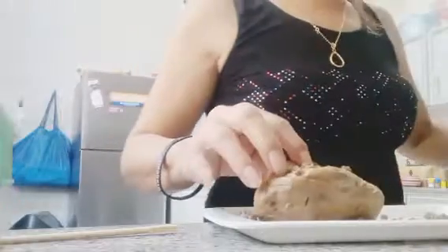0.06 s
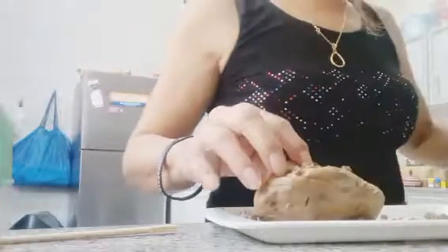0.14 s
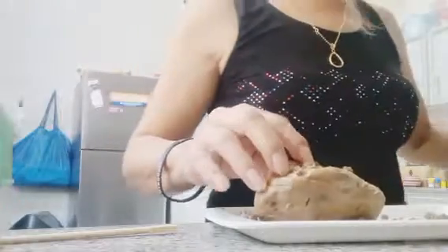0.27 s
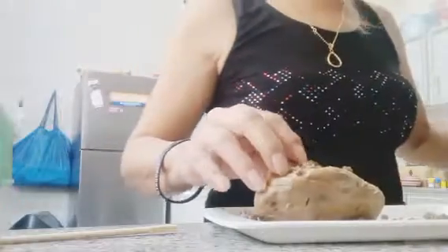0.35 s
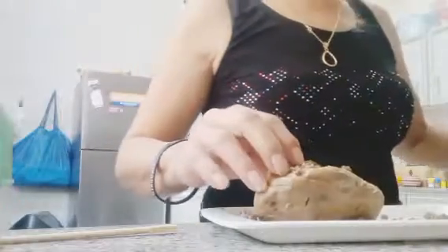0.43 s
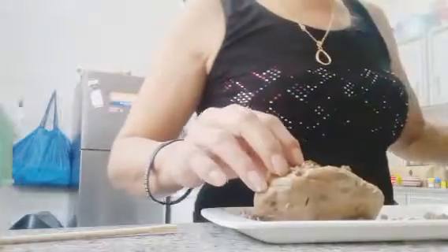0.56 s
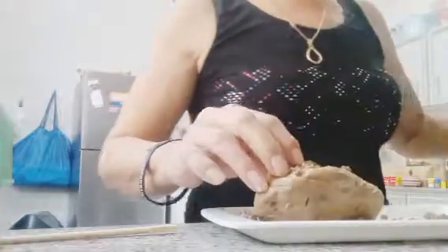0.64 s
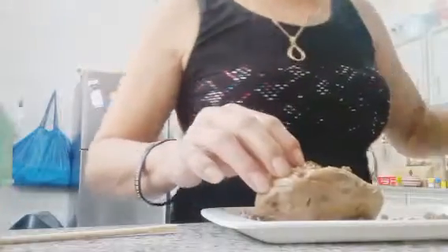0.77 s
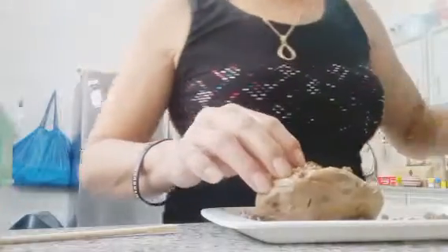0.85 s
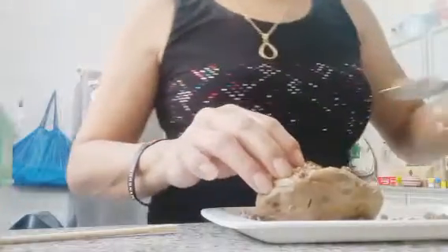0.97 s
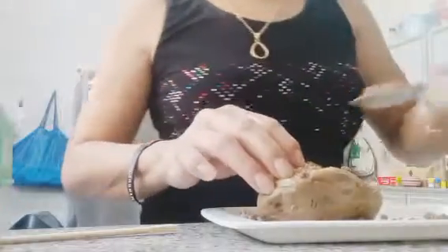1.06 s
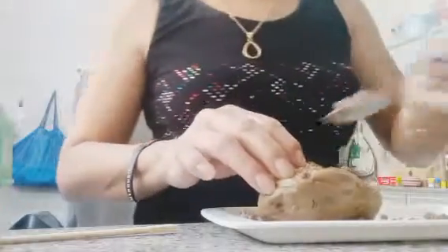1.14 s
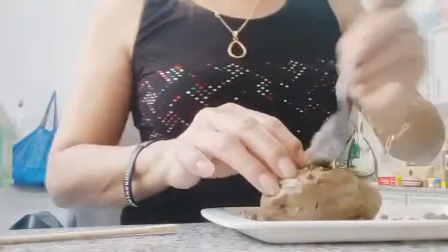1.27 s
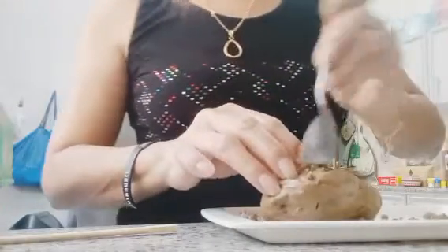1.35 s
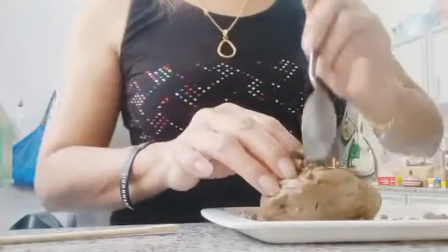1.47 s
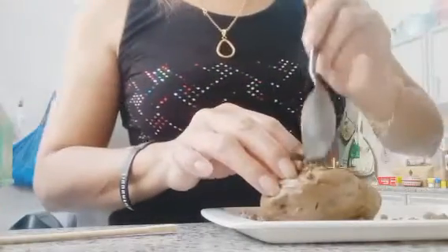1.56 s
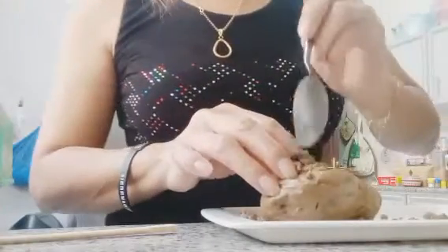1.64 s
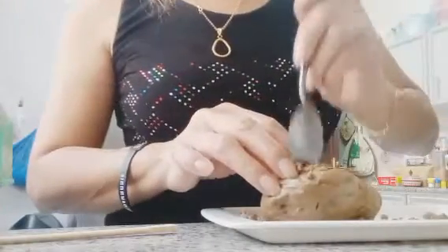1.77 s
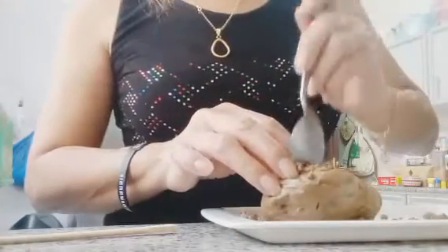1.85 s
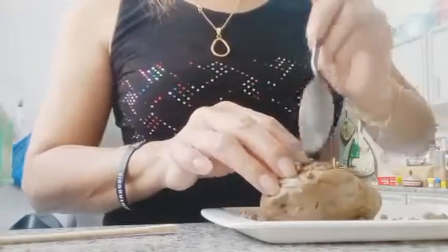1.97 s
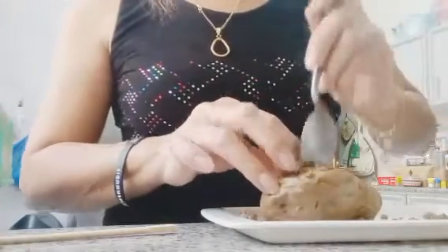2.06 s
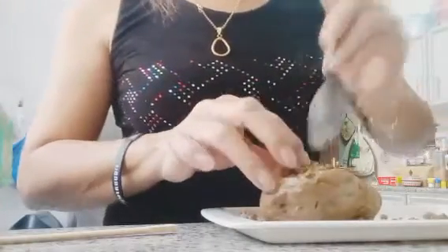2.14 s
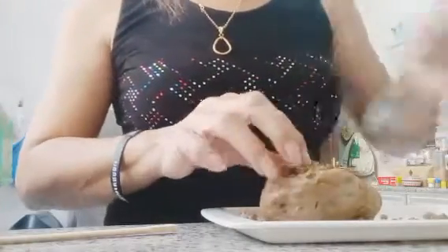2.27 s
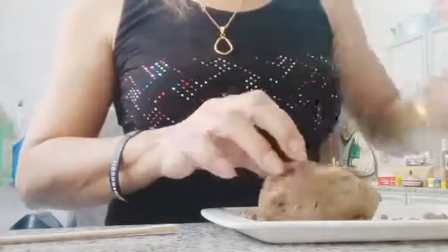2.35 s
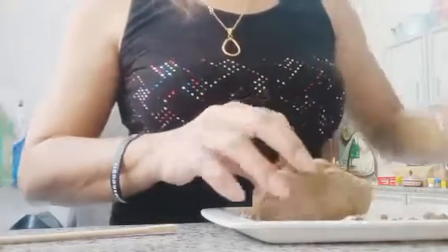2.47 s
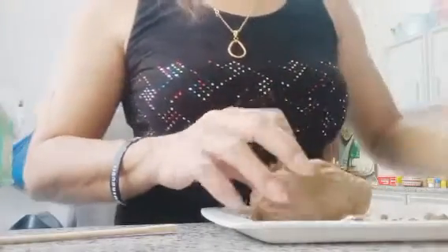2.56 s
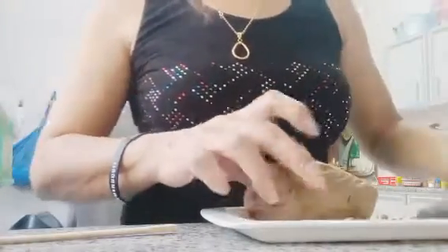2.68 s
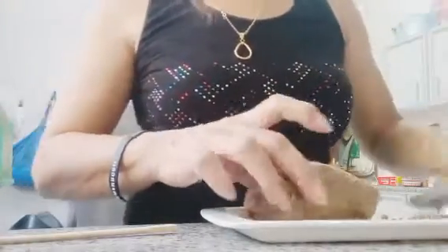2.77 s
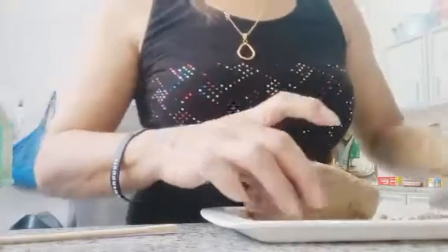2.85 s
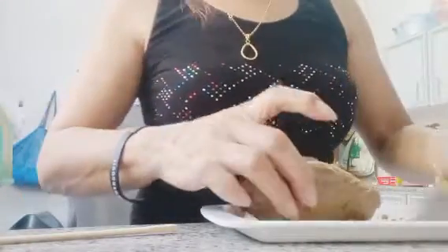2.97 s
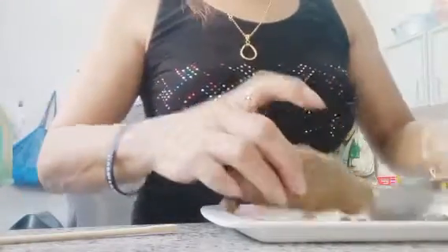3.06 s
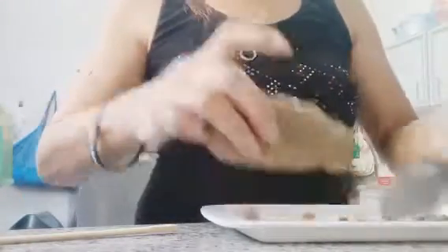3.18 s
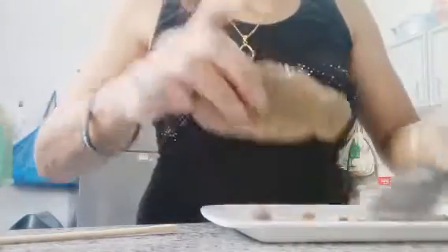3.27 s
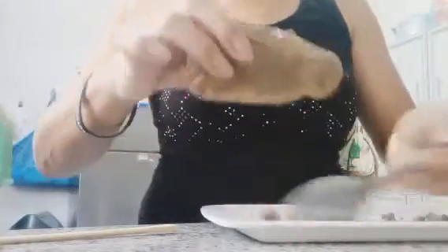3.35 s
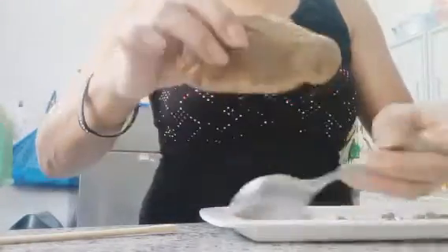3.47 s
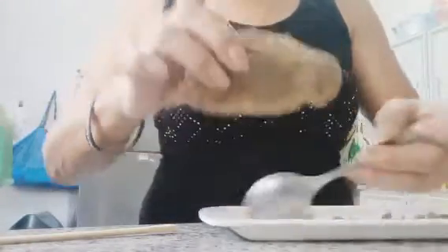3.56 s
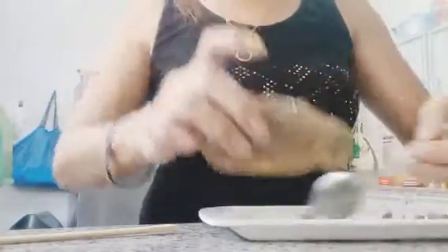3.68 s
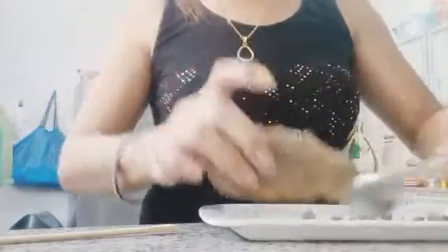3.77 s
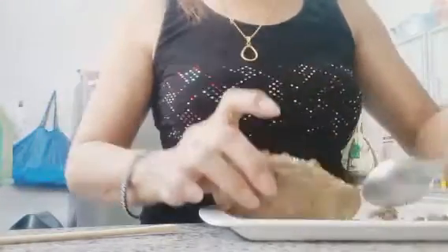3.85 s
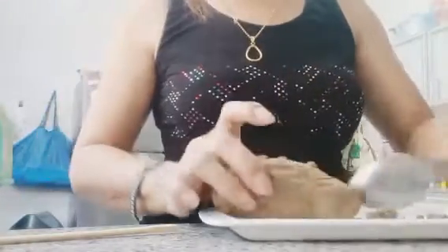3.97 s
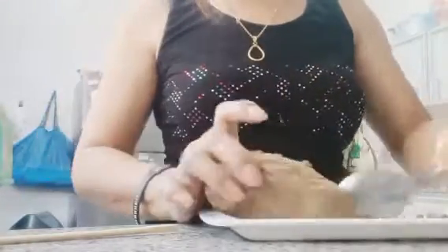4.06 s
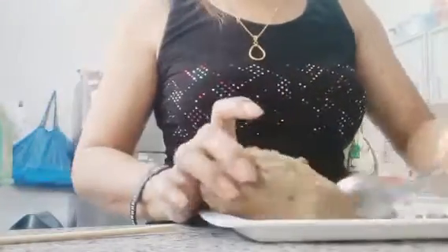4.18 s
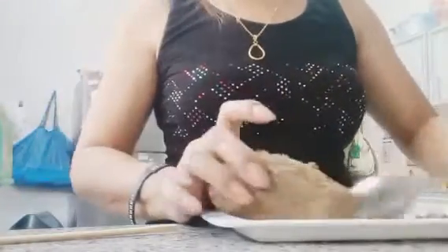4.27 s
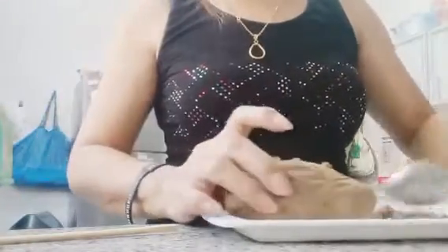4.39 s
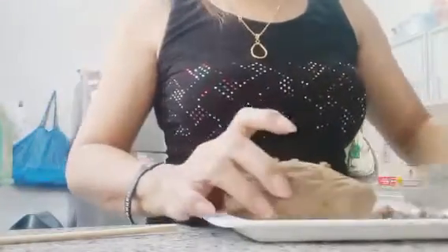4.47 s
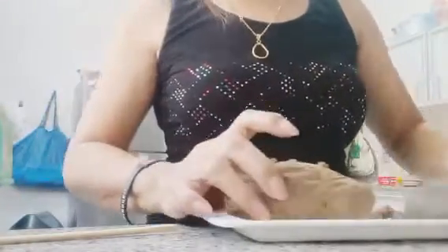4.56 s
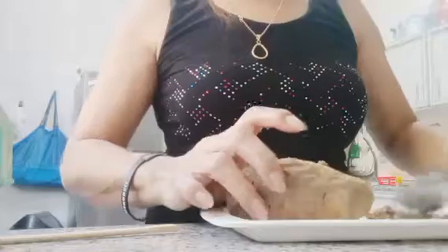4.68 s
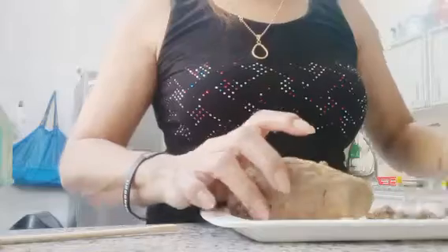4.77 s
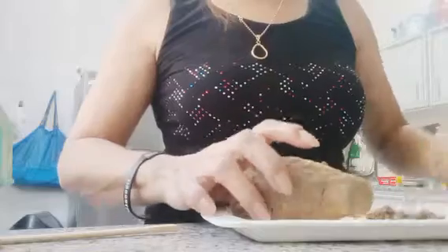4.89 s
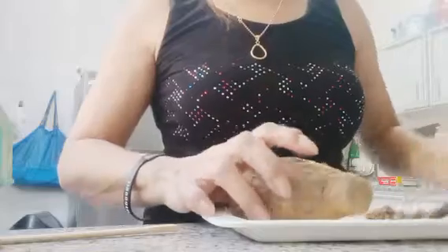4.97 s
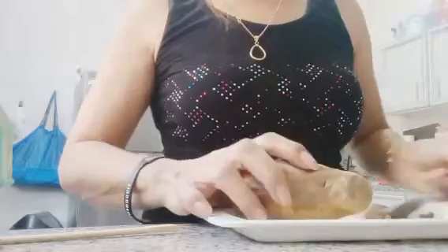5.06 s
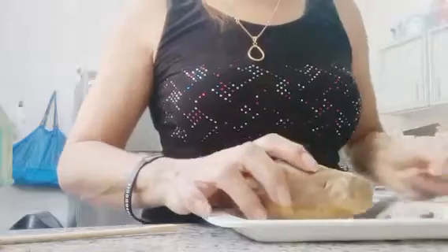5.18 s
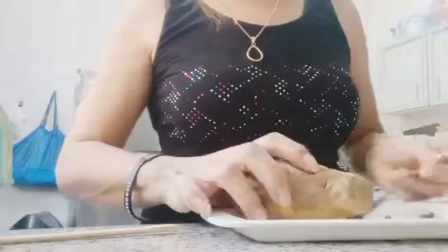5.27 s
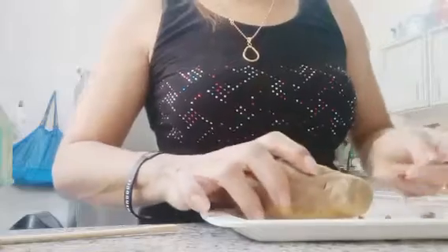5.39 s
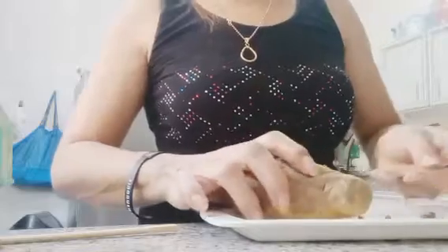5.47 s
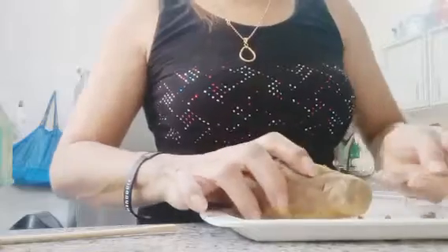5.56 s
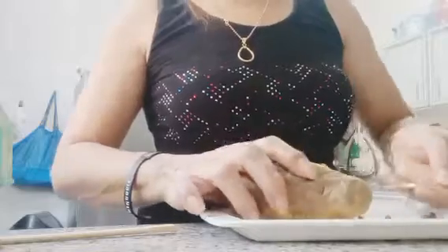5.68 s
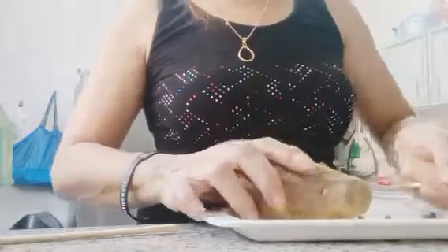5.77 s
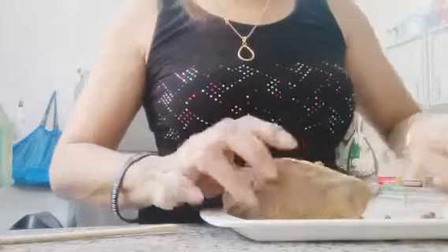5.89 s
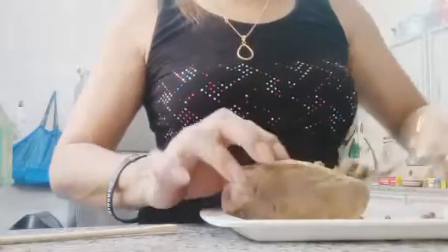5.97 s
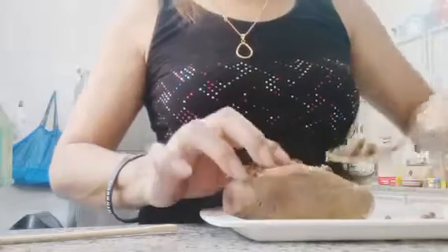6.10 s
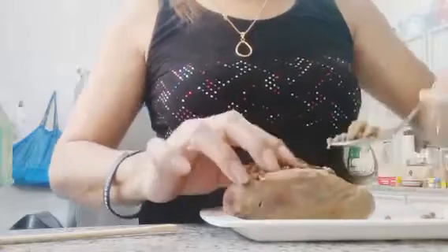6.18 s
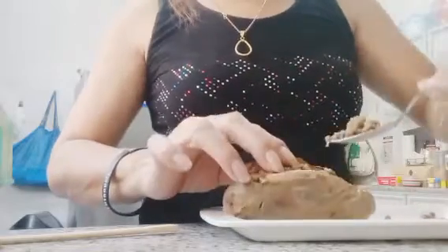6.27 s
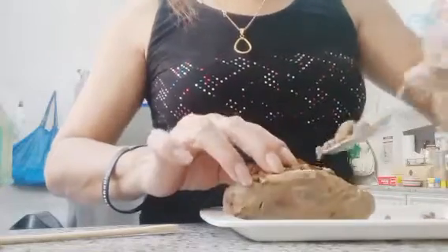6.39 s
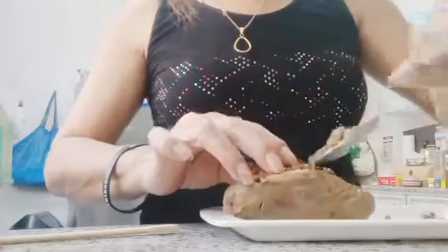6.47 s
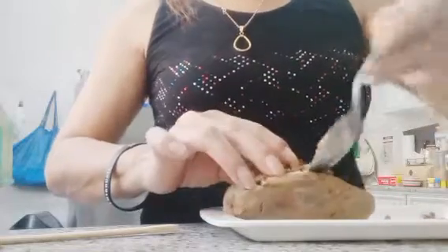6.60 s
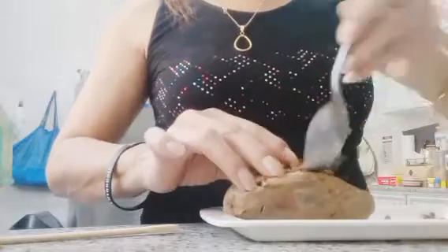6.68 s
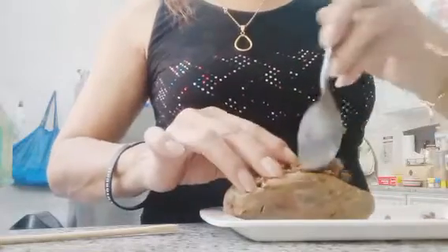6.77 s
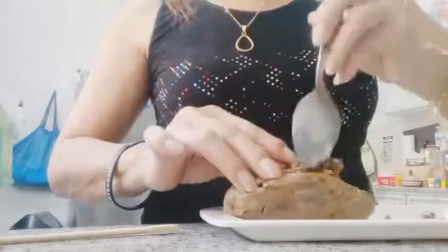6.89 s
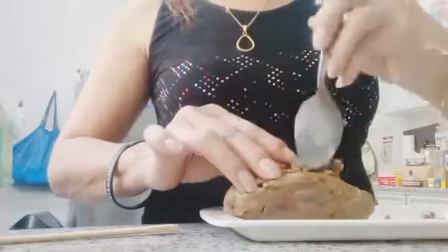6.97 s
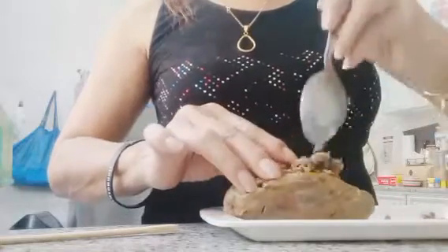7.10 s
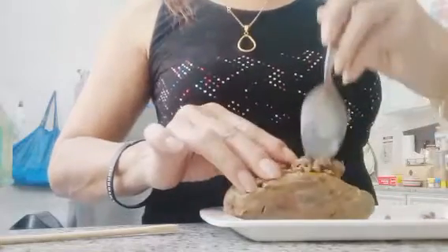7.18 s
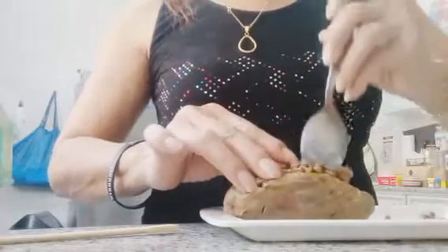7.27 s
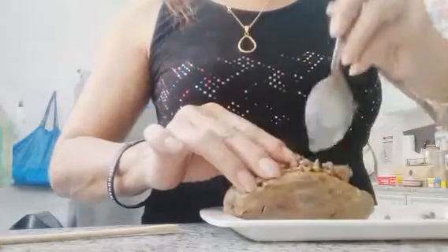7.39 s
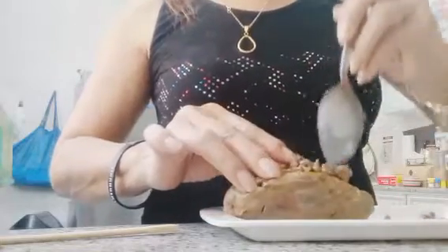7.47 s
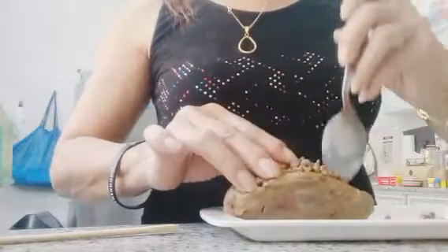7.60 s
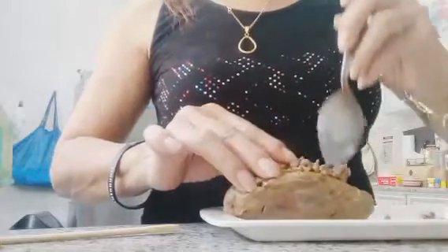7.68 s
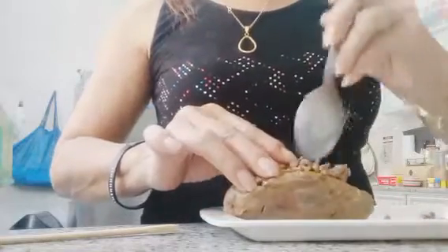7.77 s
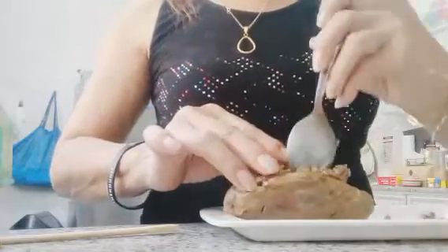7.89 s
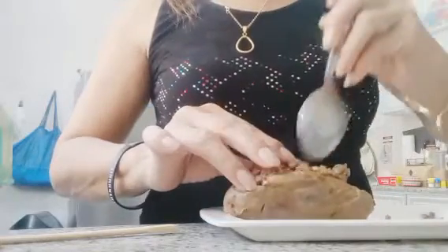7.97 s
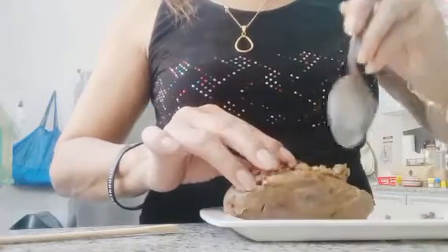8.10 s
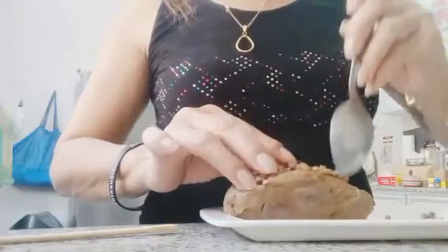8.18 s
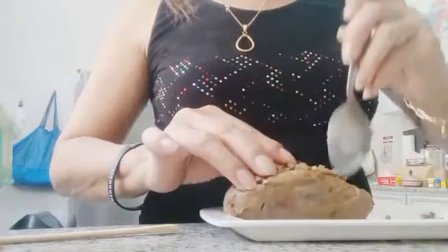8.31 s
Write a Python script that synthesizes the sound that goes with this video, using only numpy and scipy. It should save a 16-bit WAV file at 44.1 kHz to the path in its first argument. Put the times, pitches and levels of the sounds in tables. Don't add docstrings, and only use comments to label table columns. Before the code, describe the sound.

Quiet humming kitchen with faint crumb ticks, then three seconds of sharp spoon clacks and gritty scrapes on a ceramic plate, then quiet again.

```python
import sys
import numpy as np
from scipy import signal
from scipy.fft import rfft, irfft, next_fast_len
from scipy.io import wavfile
from scipy.ndimage import uniform_filter1d

SR = 44100
rng = np.random.default_rng(int(sys.argv[2]) if len(sys.argv) > 2 else 0)


def pcm_store(signal):
    levels = np.round(np.clip(np.atleast_2d(signal), -1, 1) * 32767)
    wavfile.write(sys.argv[1], SR, levels.astype(np.int16).T)


def makeup_ratio(level_db):
    decades = np.asarray(level_db, float) / 20
    return 10 ** decades


N = 367735
T = np.arange(N) / SR
BUSY = slice(int(2.5 * SR), int(5.4 * SR))
ALIKE_HZ = 800


def shape(x, gain):
    n = next_fast_len(x.shape[-1])
    hz = np.arange(n // 2 + 1) * SR / n + 1
    return irfft(rfft(x, n) * gain(hz), n)[..., :x.shape[-1]]


def colour(points, hz):
    f, db = np.transpose(points)
    return makeup_ratio(np.interp(np.log(hz), np.log(f), db))


def peak(hz, centre_hz, width_hz):
    return np.exp(-2 * ((hz - centre_hz) / width_hz) ** 2)


def bumps(rows, hz):
    return sum(db * peak(hz, centre, width) for centre, width, db in rows)


def unit(x):
    return x / np.sqrt(np.mean(x ** 2))


def fade(t, t60):
    return np.exp(-np.log(1000) * t / t60)


def walk(rate):
    k = int(SR / rate)
    steps = np.repeat(rng.standard_normal(N // k + 1), k)
    return 1.6 * uniform_filter1d(uniform_filter1d(steps, k), k)[:N]


def swells(rows, steady_db):
    t = T[::64]
    power = makeup_ratio(steady_db) ** 2
    power = power + sum(makeup_ratio(db) ** 2 * peak(t, s, length) ** 2 for s, length, db in rows)
    return np.interp(T, t, 10 * np.log10(power))


def tone(hz):
    return np.sin(2 * np.pi * np.cumsum(hz) / SR)


def add(out, s, x):
    i = int(s * SR)
    out[..., i:i + x.shape[-1]] += x[..., :out.shape[-1] - i]


# (frequency [Hz], level [dB per Hz])
AIR_COLOUR = [(12, -60), (20, -26), (37, -25), (73, -16.5), (108, -6), (151, -11), (297, -14), (492, -16.5),
              (670, -22), (1510, -32.5), (4050, -41.5), (4530, -39.5), (11100, -53), (15200, -59),
              (16500, -66)]
# (frequency [Hz], width [Hz], level [dB])
AIR_BUMPS = [(46.5, 4.3, 7), (94.06, 32, 5.5), (122.7, 7.4, -1), (434.3, 12, 4), (489, 60, -8.5),
             (680, 4.6, 11.5), (2150, 380, 3), (6300, 920, 4.5), (15200, 1500, 3)]
AIR_DB = -54.5


def air():
    def spectrum(f):
        return colour(AIR_COLOUR, f) * makeup_ratio(bumps(AIR_BUMPS, f))

    def apart(f):
        return 0.03 + 0.47 / (1 + (ALIKE_HZ / f) ** 2.5)

    mid = shape(rng.standard_normal(N), lambda f: spectrum(f) * np.sqrt(1 - apart(f)))
    side = shape(rng.standard_normal(N), lambda f: spectrum(f) * np.sqrt(apart(f)))
    n = next_fast_len(N)
    both = rfft(np.array([mid + side, mid - side]), n)
    half_octaves = 2 * np.log2((np.arange(n // 2 + 1) * SR / n + 1) / 32)
    out = 0
    for k in range(-1, 19):
        window = np.cos(np.pi / 2 * np.clip(half_octaves - k, -1, 1)) ** 2
        band = irfft(both * window, n)[:, :N]
        swell_db = 3.5 if k < 4 else 1.2
        out = out + band * makeup_ratio(swell_db * walk(4) + 0.8 * walk(12))
    return unit(out) * makeup_ratio(AIR_DB)


# (time [s], length [s], level [dB])
HUM_SWELLS = [(.17, 0.044, -47), (.5, 0.14, -50), (.78, .13, -47.5), (1.3, .07, -52), (1.52, 0.12, -44),
              (1.68, 0.087, -50.5), (1.85, 0.14, -44.5), (2.66, 0.036, -46), (3.22, 0.048, -46.5),
              (3.52, 0.089, -53), (3.79, 0.034, -43.5), (4.35, 0.085, -57), (4.63, 0.09, -47),
              (5.2, 0.21, -51), (5.46, 0.1, -47), (5.82, 0.11, -47.5), (6.32, 0.065, -46.5),
              (6.6, 0.11, -46), (6.89, 0.053, -47.5), (7.05, 0.1, -50.5), (7.3, 0.15, -51),
              (7.65, .12, -49.5), (8.1, 0.17, -52), (8.29, .07, -47)]
HUM_HZ, HUM_WANDER_HZ, HUM_DB = 98.4, 4, -58
THROB_HZ, THROB_DEPTH = 10.6, 0.37


def fridge():
    phase = 2 * np.pi * np.cumsum(HUM_HZ + HUM_WANDER_HZ * walk(8)) / SR
    throb = 1 + THROB_DEPTH * tone(THROB_HZ + 2.1 * walk(2.7))
    level_db = swells(HUM_SWELLS, HUM_DB) + 0.98 * walk(12)
    level_db = level_db + np.array([[-0.4], [0.4]])
    return np.sqrt(2) * throb * np.sin(phase + np.array([[0], [0.15]])) * makeup_ratio(level_db)


# (time [s], length [s], level [dB])
LOW_WHINE = [
    (0.222, .1, -78),
    (0.416, 0.086, -74.5),
    (1.29, 0.17, -76.5),
    (2.4, .14, -84),
    (5.95, 0.12, -73),
    (7.11, .1, -73),
    (7.686, 0.14, -74),
    (7.84, 0.074, -80),
    (8.108, 0.062, -77),
    (8.256, 0.09, -73.5),
]
# (time [s], length [s], level [dB])
HIGH_WHINE = [
    (.42, .2, -77),
    (1, 0.083, -70.5),
    (1.55, 0.1, -72),
    (2.2, 0.69, -79),
    (6.68, 0.5, -75.5),
    (7.3, 0.44, -79),
    (7.72, 0.17, -75),
    (8, .2, -75),
]
WHINE_WIDTH_HZ = 26


def whines():
    out = np.zeros((2, N))
    for hz, rows, steady_db in [(3527, LOW_WHINE, -104), (4447, HIGH_WHINE, -84.5)]:
        noise = rng.standard_normal((2, N))
        line = shape(noise, lambda f: peak(f, hz, WHINE_WIDTH_HZ) + 0.3 * peak(f, hz, 4 * WHINE_WIDTH_HZ))
        out += unit(line) * makeup_ratio(swells(rows, steady_db) + 4.5)
    return out


# (time [s], level [dB], centre [Hz], width as share of centre)
TICKS = [
    (0.614, -53, 8900, 0.14),
    (1.0257, -44.5, 5900, 0.14),
    (1.0394, -51, 6370, 0.28),
    (1.3763, -48, 6100, 0.12),
    (1.72, -45.5, 9700, 0.081),
    (1.7888, -62, 6050, 0.16),
    (5.9767, -61, 6040, 0.16),
    (6.2751, -49.5, 6390, 0.16),
]
# (time [s], level [dB], centre [Hz], width as share of centre)
FLICKS = [
    (0.9941, -61, 9500, 0.6),
    (1.0277, -49, 9890, 1),
    (1.235, -64, 9990, 0.6),
    (2.0742, -61, 9890, 0.7),
    (2.434, -62, 9370, 0.7),
    (5.978, -56, 8500, 0.63),
    (6.14, -51.5, 12570, 0.66),
    (6.4619, -62, 9860, 0.42),
    (7.4845, -66.5, 9850, 0.6),
]
# (time [s], level [dB], centre [Hz], width as share of centre)
TAPS = [
    (1.975, -60, 2600, .2),
    (6.276, -59, 2600, 0.36),
    (6.895, -55, 807, 0.14),
    (6.896, -56, 1360, 0.15),
    (6.895, -53.5, 2160, 0.26),
    (6.901, -60, 3250, 0.12),
]


def crumbs():
    out, t = np.zeros((2, N)), T[:SR // 10]
    for s, db, hz, share in TICKS + FLICKS + TAPS:
        width_hz = np.clip(share, 0.02, 2) * hz
        noise = rng.standard_normal((2, len(t)))
        grain = unit(shape(noise, lambda f: peak(f, hz, width_hz) + 0.056 * (f > 2500) * (hz > 4000)))
        envelope = np.clip(t / 0.0005, 0, 1) * fade(t, 0.038 * (6000 / hz) ** 0.89)
        add(out, s, makeup_ratio(db - 2.5) * grain * envelope)
    return out


# (time [s], length [s], level [dB])
BRUSHES = [
    (.6, 0.26, -76.5),
    (2.4, .5, -82),
    (5.22, 0.18, -72),
    (6.15, 0.45, -75),
    (6.5, 0.47, -79),
    (8.3, 0.55, -79),
]


def rustle():
    hiss = unit(shape(rng.standard_normal((2, N)), lambda f: peak(f, 6300, 5000)))
    return hiss * makeup_ratio(swells(BRUSHES, -89) + 2.0 * walk(30))


# (start [s], end [s], start frequency [Hz], end frequency [Hz], level [dB])
WHISTLES = [
    (1.55, 1.78, 4250, 3900, -80),
    (7.0, 7.3, 4930, 4930, -79),
    (6.02, 6.3, 9800, 9400, -83),
    (8.15, 8.36, 9900, 9700, -86),
    (7.88, 8.1, 2900, 2800, -84),
]


def whistles():
    out = np.zeros((2, N))
    for start, end, start_hz, end_hz, db in WHISTLES:
        t = T[:int((end - start) * SR)]
        waver = unit(shape(rng.standard_normal((2, N // 8)), lambda f: peak(f, 0, 73)))[:, :len(t)]
        glide = tone(np.linspace(start_hz, end_hz, len(t)))
        arch = np.sin(np.pi * t / (end - start)) ** 0.5
        add(out, start, makeup_ratio(db + 7) * waver * glide * arch)
    return out


BEAT_DEPTH, LONGEST_T60_S = 0.7, 0.55


def ring(modes, t, damp=1):
    hz, db, t60 = np.transpose(modes)[:, :, None, None]
    turn, slip, beat = 2 * np.pi * rng.random((3, len(modes), 2, 1))
    rate = np.log(1000) / (np.minimum(t60, LONGEST_T60_S) * damp)
    values = (t, 2 * np.pi * hz, turn, slip, 120 + 60 * beat, rate, makeup_ratio(db))
    t, speed, turn, slip, beat_speed, rate, gain = map(np.float32, values)
    beating = 1 + BEAT_DEPTH * np.cos(beat_speed * t + slip)
    rise = np.clip(t / 0.001, 0, 1)
    return rise * np.sum(gain * np.exp(-rate * t) * beating * np.sin(speed * t + turn), axis=0)


# (frequency [Hz], level [dB], t60 [s])
PLATE_MODES = [(725, -14, 0.042), (908, -3, 0.14), (1060, -8, 0.13), (1325, 0, 0.16), (1357, -1, 0.13),
               (1704, -6, 0.23), (1790, -2.5, 0.25), (1890, -7, 0.18), (2065, -8, 0.2), (2373, -5, 0.19),
               (2530, -4.5, 0.093), (2760, -5, 0.14), (2995, -11, .12), (3273, -2.5, 0.29),
               (3520, -7, 0.18), (3750, -4, 0.37), (4030, -3, 0.18), (4360, -5.5, 0.22), (4690, -9, 0.12),
               (5470, -4, 0.22), (5850, -6, .17), (6280, -8, .18), (6550, -9, 0.08), (6860, -6, 0.24),
               (7200, -7.5, .1), (8830, -10, .1), (9770, -14, 0.089)]


def spot(spread_db):
    offsets = spread_db * rng.standard_normal(len(PLATE_MODES))
    return [(hz, db + c, t60) for (hz, db, t60), c in zip(PLATE_MODES, offsets)]


# (frequency [Hz], level [dB per Hz])
CLACK = [(180, -55), (300, -26), (607, -18.5), (923, -5), (1170, -3.5), (1330, -5.5), (2170, -16),
         (2360, -8.5), (3900, -8), (5100, -10), (5740, -5.5), (9180, -4), (11600, -19.5), (15200, -29),
         (16500, -42)]


def clack(t):
    return shape(rng.standard_normal((2, len(t))), lambda f: colour(CLACK, f))


def split(x):
    thud = shape(x, lambda f: 1 / (1 + (f / 600) ** 10))
    low = shape(x, lambda f: 1 / (1 + (f / 1500) ** 8))
    high = shape(x, lambda f: 1 / (1 + (5500 / f) ** 12))
    end = np.clip(np.linspace(3, -1, x.shape[-1]), 0, 1)
    return np.array([unit(b * end) for b in (thud, low - thud, x - low - high, high)])


# (time [s], strength [dB], lows [dB], highs [dB], favoured ring [Hz])
KNOCKS = [(2.508, -29, -26, -23.5, 3390), (2.5754, -12, -9.5, -10, 1814), (2.6729, -21, -4, -17.5, 712),
          (2.8929, -14.5, -4.5, -3.5, 4080), (2.902, -12.5, -17, -3, 6000), (2.9154, -13, -11, -17.5, 3160),
          (3.2063, -17, -7, -8.5, 4600), (3.2825, -13, -7.5, -13, 3140), (3.3769, -14.5, -22.5, 0, 3990),
          (3.4173, -18.5, -10, -4, 696), (3.4619, -16.5, -15, -8.5, 3714), (3.71, -14, -16.5, -6.5, 2510),
          (3.7186, -15.5, -33, -13, 2430), (3.7602, -17.5, -20, -16.5, 2310), (3.8988, -33, -17, -26, 2000),
          (3.9703, -24, -1.5, -5, 1380), (4.0495, -17, -18, 1, 1310), (4.4747, -13, -5, -6.5, 1360),
          (4.7846, -14, -19, -5.5, 2625), (4.8842, -20.5, -24, -0.5, 3120),
          (4.9511, -25.5, -3.5, -18.5, 699), (5.3595, -23.5, 3.5, -4.5, 1310),
          (5.5584, -19, -6.5, -6.5, 1310), (5.7226, -44.5, -22, -0.5, 1900)]
# (chatter [s], three further partials [Hz], their level [dB])
KNOCK_TONES = [(0.01, 1060, 2612, 3726, -2), (0.01, 2050, 2589, 3710, -2), (0.01, 1350, 1689, 2334, -1.8),
               (0.01, 2720, 3653, 5830, -2), (0.01, 1890, 3500, 4303, -2), (0.01, 2410, 3528, 5890, -2),
               (0.01, 1710, 2690, 3733, -2), (0.01, 1340, 1870, 2628, -2), (0.01, 3310, 3732, 6550, -2),
               (0.01, 1740, 2378, 3243, -2), (0.01, 2450, 2892, 3273, -2), (0.01, 3340, 3706, 5560, -2),
               (0.01, 3350, 3920, 4336, -2), (0.01, 3210, 3750, 5410, -2.3), (0.01, 1580, 2510, 3810, -2),
               (0.01, 730, 1725, 2540, -1.8), (0.01, 2260, 2760, 6860, -2), (0.01, 3200, 3780, 4505, -2.2),
               (0.01, 1790, 3244, 4640, -2), (0.01, 1510, 2770, 3520, -1.8), (0.01, 1310, 1740, 4660, -2.4),
               (0.01, 1080, 1730, 2510, -2), (0.01, 2530, 3740, 6285, -2), (0.01, 3620, 5380, 6400, -1.8)]
# (time [s], strength [dB], favoured ring [Hz])
NICKS = [(2.5995, -27, 1790), (2.6262, -26, 5550), (2.666, -29, 4030), (2.9552, -22.5, 4130),
         (2.968, -25, 3900), (3.2805, -27, 1340), (3.4138, -26.5, 2420), (3.4582, -22.5, 2430),
         (3.469, -20.5, 3750), (3.5925, -30.5, 5900), (3.6288, -27.5, 5680), (3.658, -28.5, 2360),
         (3.8782, -36, 3900), (3.98, -25.5, 1380), (4.057, -23, 2260), (4.143, -30.5, 3290),
         (4.1669, -30.5, 4030), (4.7822, -25, 2650), (4.9268, -23, 4780), (5.736, -59, 3930)]
# (chatter [s], three partials [Hz], their level [dB])
NICK_TONE = (0.0032, 1789.5, 3270, 5400, -12)
NICK_LOWS_DB, NICK_HIGHS_DB = -33, -1
KNOCK_DB, RING_DB, KNOCK_SPREAD_DB = -8, -18, 3
FAVOURED_DB, FAVOURED_T60_S, TONE_T60_PER_HOLD = 2, 0.068, 4
DEEP_DB = -4.5
CRACK_DB, CRACK_S = 2.5, 0.0015
THUD_DB, THUD_PER_HIGHS, THUD_HOLD_S, LOADED_DB, LOADED_S = -35.5, -0.74, 0.039, -16, 4.6


def knocks():
    out, t = np.zeros((2, N)), T[:SR // 7]
    crack = 1 + makeup_ratio(CRACK_DB) * np.exp(-t / CRACK_S)
    thud = np.clip(t / 0.002, 0, 1) * np.exp(-t / THUD_HOLD_S)
    contacts = list(zip(KNOCKS, KNOCK_TONES))
    contacts += [((s, db, NICK_LOWS_DB, NICK_HIGHS_DB, hz), NICK_TONE) for s, db, hz in NICKS]
    for (s, db, low_db, high_db, hz), (hold, *partials_hz, partial_db) in contacts:
        thud_db = THUD_DB + THUD_PER_HIGHS * high_db + LOADED_DB * (s > LOADED_S)
        gains = makeup_ratio(np.array([thud_db, low_db, 0, high_db]))[:, None, None]
        burst = np.clip(t / 0.0008, 0, 1) * np.exp(-(t / hold) ** 1.5)
        envelopes = np.array([thud, burst, burst * crack, burst * crack])[:, None]
        struck = spot(KNOCK_SPREAD_DB)
        chatter = unit(clack(t))
        chatter[:, :SR // 20] += 0.9 * unit(ring(struck, t[:SR // 20], 37))
        contact = np.sum(gains * split(chatter) * envelopes, axis=0)
        tail = ring([(f, d + low_db * (f < 1500) + high_db * (f > 5500), t60) for f, d, t60 in struck], t)
        favoured = [(hz, FAVOURED_DB + DEEP_DB * (hz < 1000), FAVOURED_T60_S * (2500 / hz) ** 0.2)]
        favoured += [(f, partial_db, TONE_T60_PER_HOLD * hold) for f in partials_hz]
        add(out, s, makeup_ratio(db + KNOCK_DB) * (contact + makeup_ratio(RING_DB) * tail + ring(favoured, t)))
    return out


# (start [s], push [s], top pressure [dB], lift [dB per s], bowl resonance [Hz])
DRAGS = [(2.595, 0.088, -31, 1500.5, 2109), (2.925, 0.039, -26.5, 103, 2796),
         (3.225, 0.0037, -44.5, 199, 2147), (3.3, .004, -33.5, 210.5, 2050),
         (3.39, 0.049, -32.5, 396, 3100), (3.485, 0.0062, -31, 62.5, 3008),
         (3.585, 0.076, -32.5, 196, 3700), (3.735, 0.023, -30.5, 155, 2840), (4.07, 0.03, -32.5, 61, 2030),
         (4.15, 0.039, -33.5, 312.5, 3210), (4.495, 0.068, -32.5, 233, 1450),
         (4.805, 0.029, -36, 152, 2670), (4.9, 0.067, -40, 246, 1900)]
PUSH_DB_PER_S, LONGEST_LIFT_S, LANDING_S = 47.5, 0.2, 0.012
DRAG_LOWS_DB, LOWS_DB_PER_OCTAVE = -7, -9.5
DRAG_HIGHS_DB, HIGHS_DB_PER_OCTAVE, DULL_DB_PER_S = -4, 0.5, 54.5


def current_stroke(t):
    return np.clip(np.searchsorted(np.transpose(DRAGS)[0], t) - 1, 0, None)


def strokes():
    start, push, top_db, lift, hz = np.transpose(DRAGS)
    k = current_stroke(T)
    after = T - start[k] - push[k]
    pressure = top_db[k] - np.where(after < 0, -after * PUSH_DB_PER_S, after * lift[k])
    touching = (T > start[0]) & (after < LONGEST_LIFT_S)
    pressure = np.where(touching, np.maximum(pressure, -90), -90)
    pressure = uniform_filter1d(pressure, int(LANDING_S * SR))
    bowl_hz = uniform_filter1d(hz[k], SR // 40)
    octaves = np.log2(bowl_hz / 2000)
    lows = DRAG_LOWS_DB + LOWS_DB_PER_OCTAVE * octaves
    highs = DRAG_HIGHS_DB + HIGHS_DB_PER_OCTAVE * octaves
    highs = highs - DULL_DB_PER_S * np.clip(after, 0, LONGEST_LIFT_S)
    return pressure, lows, highs, bowl_hz


def flutter(width_hz):
    step, n = 16, BUSY.stop - BUSY.start
    noise = rng.standard_normal((2, n // step + 1))
    slow = unit(shape(noise, lambda f: peak(f, 0, step * width_hz)))
    return np.sqrt(2) * uniform_filter1d(np.repeat(slow, step, axis=1), step)[:, :n]


# (three modes [Hz], level [dB])
SINGS = [(1790, 3500, 4030, -8), (1360, 1880, 3950, -10), (1790, 2350, 3710, -9.5), (1323, 1500, 4000, -7),
         (1790, 3700, 3400, -11), (1810, 3260, 3790, -7.5), (2530, 3600, 5900, -8.5),
         (1790, 2370, 3400, -8.5), (1310, 1600, 3080, -7.5), (920, 3390, 4900, -6), (1340, 2900, 3800, -5),
         (1800, 3280, 3500, -9), (1340, 1760, 4600, -10)]
SING_WIDTH_HZ, SING_T60_S, SING_DB_PER_OCTAVE, SING_DB, SING_WANDER = 190, 0.13, -1.5, -3.5, 0.012


def sing(force):
    k = current_stroke(T[BUSY])
    *modes_hz, db = np.transpose(SINGS)
    keep = np.exp(-np.log(1000) / (SING_T60_S * SR))
    out = 0
    for mode_hz in modes_hz:
        hz = mode_hz[k]
        patchy_db = 3.5 * walk(30)[BUSY]
        drive_db = db[k] + SING_DB + patchy_db + SING_DB_PER_OCTAVE * np.log2(hz / 2000)
        level = signal.lfilter([1 - keep], [1, -keep], force * makeup_ratio(drive_db))
        wavering_hz = hz * (1 + SING_WANDER * walk(20)[BUSY])
        out = out + level * flutter(SING_WIDTH_HZ) * tone(wavering_hz)
    return out


def plate(t):
    quick = clack(t) * fade(t, 0.05)
    return unit(quick) + makeup_ratio(-4) * unit(ring(spot(3), t, 0.15))


DRAG_DB, GRIT_RATE, GRIT_SCATTER_DB = -1, 2600, 4.2
BOWL_DB, BOWL_WIDTH_HZ = -14.5, 360
SIZZLE_DB, SIZZLE_DB_PER_OCTAVE, SIZZLE_HZ = -17, 6, 14010


def scrape():
    pressure, lows, highs, bowl_hz = (c[BUSY] for c in strokes())
    n = len(pressure)
    size = makeup_ratio(GRIT_SCATTER_DB * np.clip(rng.exponential(size=n), 0, 3))
    force = makeup_ratio(2.6 * walk(70)[BUSY] + DRAG_DB + pressure)
    grains = (rng.random(n) < GRIT_RATE / SR) * rng.standard_normal(n) * size
    grit = unit(grains) * force
    bowl = makeup_ratio(BOWL_DB) * force * flutter(BOWL_WIDTH_HZ) * tone(bowl_hz)
    sizzle = shape(np.array([grit, np.roll(grit, SR // 900)]), lambda f: peak(f, SIZZLE_HZ, 4500))
    sizzle_db = highs + SIZZLE_DB + 4.5 * walk(44)[BUSY] + SIZZLE_DB_PER_OCTAVE * np.log2(bowl_hz / 2000)
    sound = bowl + sing(force) + sizzle * makeup_ratio(sizzle_db)
    where = np.argmax([walk(14)[BUSY] + 0.6 * rng.standard_normal(n) for _ in range(4)], axis=0)
    for k in range(4):
        bands = split(plate(T[:SR // 6]))[1:] / np.sqrt(SR // 6)
        for db, band in zip((lows, 0, highs), bands):
            drive = grit * (where == k) * makeup_ratio(db)
            sound = sound + signal.oaconvolve(drive[None], band, axes=1)[:, :n]
    out = np.zeros((2, N))
    out[:, BUSY] = sound
    return out


# (frequency [Hz], level [dB], t60 [s])
LAST_CLINK = [(1300, -0.5, 0.27), (1360, -7.5, 0.28), (1736, -17, .2), (2199, -20, 0.12), (2690, -14, 0.1),
              (3100, -9, 0.22), (3210, -11.5, 0.28), (3700, 1, 0.23), (4140, -12, 0.25), (4370, -18, 0.33),
              (5250, -22, 0.18), (6300, -11.5, 0.42), (8840, -10, .13), (9800, -15, .15)]
# (time [s], level [dB], extra at first instant [dB],
# modes (frequency [Hz], level [dB], t60 [s]))
CLINKS = [
    (2.678, -43.5, -20, [(590, -3.5, .5), (1210, -3.5, .4), (1790, 0.5, .5), (2030, -5, .4)]),
    (4.19, -43.5, -26, [(1350, 2, .28), (1270, -5.5, .3), (2510, -6, .3), (3010, -7, 0.23)]),
    (4.955, -41, -20, [(1310, 1, .35), (915, -5, 0.24), (2400, -10, 0.32)]),
    (4.5, -34, -26, [(1290, 0.5, 0.41), (1390, 1, 0.38), (536.4, -9, 0.36), (3194, -9.5, .35), (4505, -8.5, .35), (5640, -11.5, 0.35), (6630, -14, 0.27)]),
    (3.973, -32.5, 4, [(442, -6.5, .1), (709, -0.5, 0.084), (921, -3, 0.18), (1380, -1.5, 0.13)]),
    (5.3626, -33.5, 4, [(705, -38, 0.093), (866, -11.5, 0.23), (1068, 1.5, 0.06), (1185, -7, .3), (1320, -5, 0.14), (1750, -3, 0.07), (1816, -6, 0.065), (2423, -9.5, 0.08), (3700, -11.5, 0.2), (5500, -19.5, 0.12), (6380, -23, 0.067)]),
    (5.558, -35.5, 13, LAST_CLINK),
]


def clinks():
    out, t = np.zeros((2, N)), T[:SR // 2]
    for s, db, first_db, modes in CLINKS:
        first = 1 + makeup_ratio(first_db) * np.exp(-t / 0.015)
        add(out, s, makeup_ratio(db) * ring(modes, t) * first)
    return out


# (time [s], frequency [Hz], level [dB])
SQUEAK = [
    (5.4, 737, -55),
    (5.46, 721, -52.5),
    (5.51, 696, -48.5),
    (5.545, 705, -48),
    (5.556, 664, -49.5),
]


def squeak():
    s, hz, db = np.transpose(SQUEAK)
    level = np.interp(T, [s[0] - 0.012, *s, s[-1] + 0.02], [-130, *db, -130])
    phase = 2 * np.pi * np.cumsum(np.interp(T, s, hz)) / SR
    return np.sqrt(2) * makeup_ratio(level - 1.5 + 1.8 * walk(60)) * np.sin(phase + np.array([[0], [1.2]]))


# (frequency [Hz], left minus right [dB])
LEAN = [(60, -2), (110, -3), (200, 6), (380, 3.5), (700, -1.5), (1290, 0), (2380, 5.5), (4400, -3),
        (8120, -2.5), (15000, -0.5)]


def spoon():
    left, right = knocks() + scrape() + clinks() + squeak()
    left = shape(left, lambda f: colour(LEAN, f) ** 0.5)
    right = shape(right, lambda f: colour(LEAN, f) ** -0.5)
    return np.array([left, right])


ROOM_DB, ROOM_T60_LOW_S, ROOM_T60_HIGH_S = -12, 0.35, 0.17


def kitchen(x):
    t = T[:SR * 3 // 4]
    noise = rng.standard_normal((2, len(t))) * np.clip(t / 0.004, 0, 1)
    low = shape(noise, lambda f: 1 / (1 + (f / 7800) ** 6))
    tail = low * fade(t, ROOM_T60_LOW_S) + (noise - low) * fade(t, ROOM_T60_HIGH_S)
    tail = tail / np.sqrt(np.sum(tail ** 2) / 2)
    return makeup_ratio(ROOM_DB) * signal.oaconvolve(x, tail, axes=1)[:, :N]


def scene():
    near = spoon() + crumbs() + rustle()
    left, right = near + kitchen(near)
    side = shape(left - right, lambda f: 1 / np.sqrt(1 + (ALIKE_HZ / f) ** 3))
    close = np.array([left + right + side, left + right - side]) / 2
    return close + air() + fridge() + whines() + whistles()


def top_cut(x):
    return signal.sosfilt(signal.butter(12, 16950, fs=SR, output="sos"), x)


# (frequency [Hz], width [Hz], level [dB])
PORT = [(8160, 610, -6), (12140, 2200, -3.5), (15100, 1800, 6.5)]
PORT_TOP_HZ, PORT_TOP_DB = 15800, -25


def record(dry):
    def port(f):
        return makeup_ratio(bumps(PORT, f) + PORT_TOP_DB * np.clip((f - PORT_TOP_HZ) / 300, 0, 1))

    mix = np.tanh(1.053 * shape(dry, port)) / 1.139
    return top_cut(mix)


dry = scene()
out = record(dry)
pcm_store(out)
```